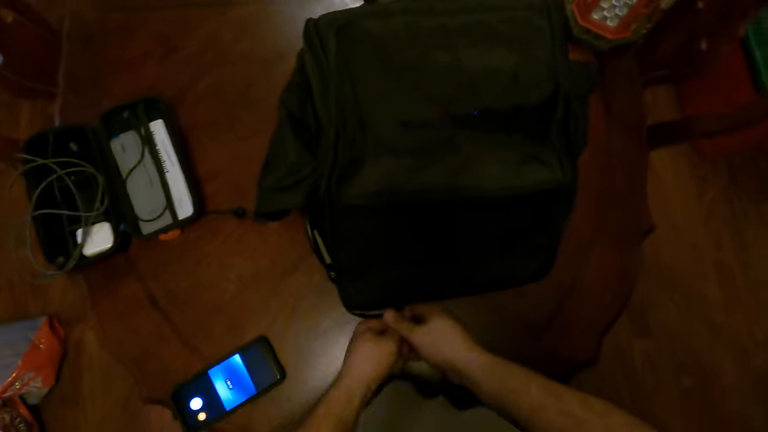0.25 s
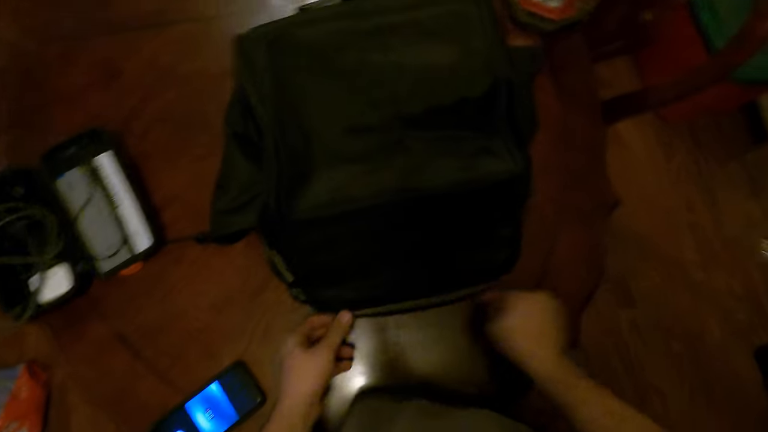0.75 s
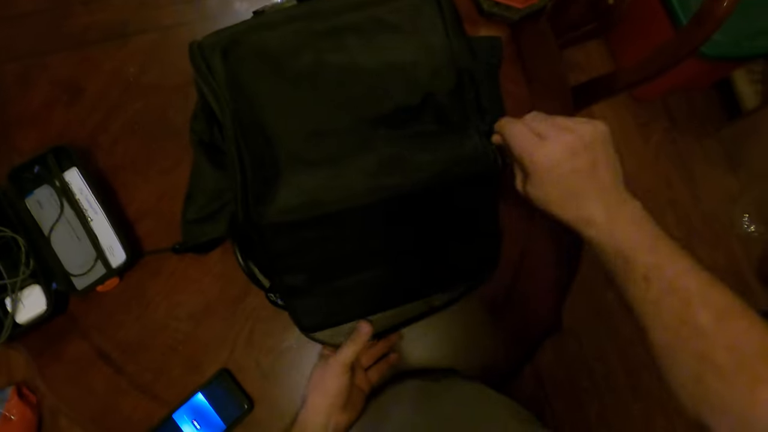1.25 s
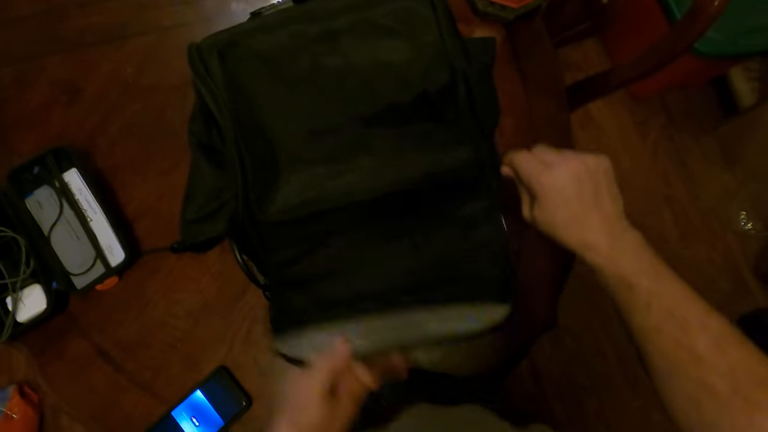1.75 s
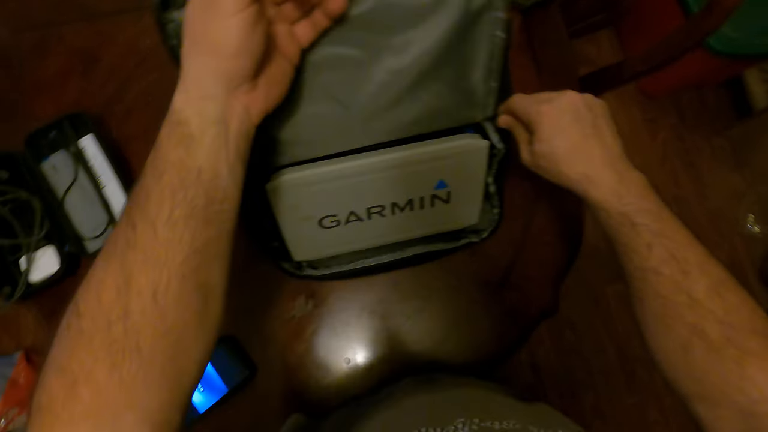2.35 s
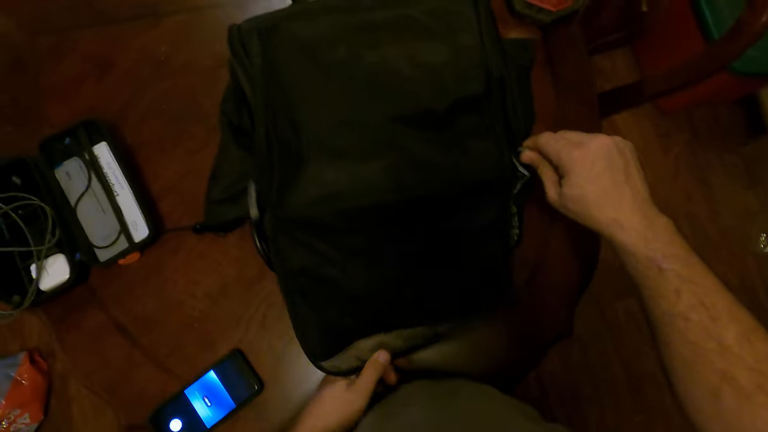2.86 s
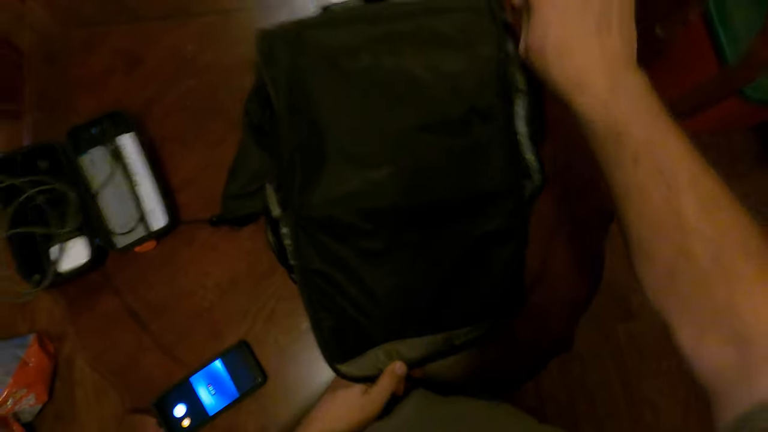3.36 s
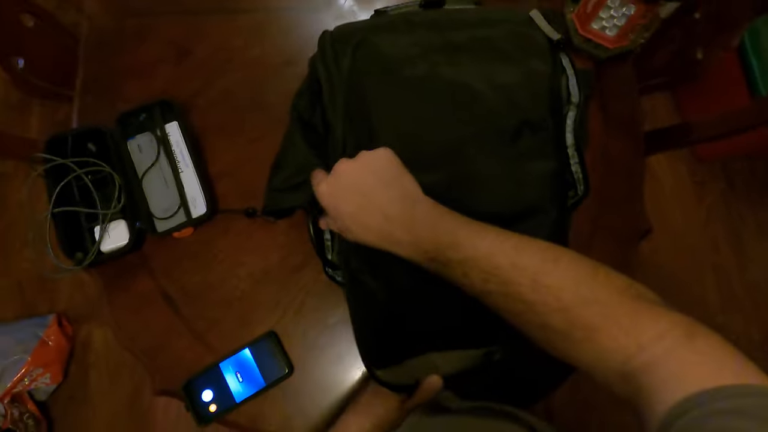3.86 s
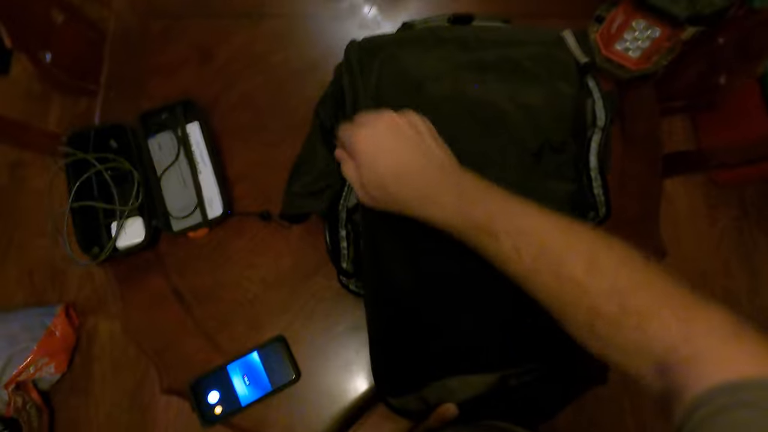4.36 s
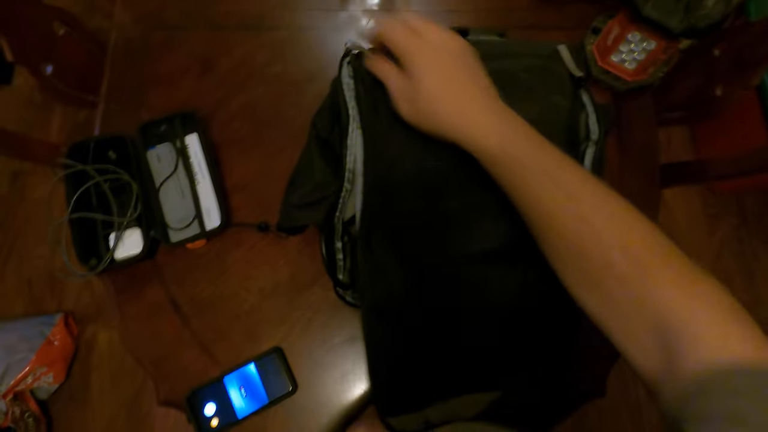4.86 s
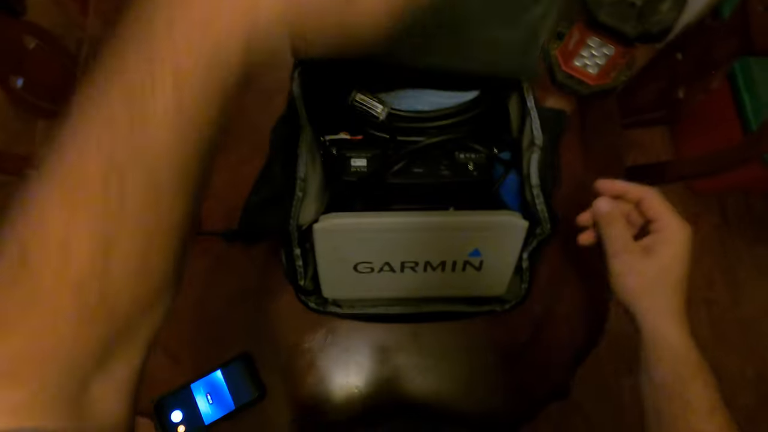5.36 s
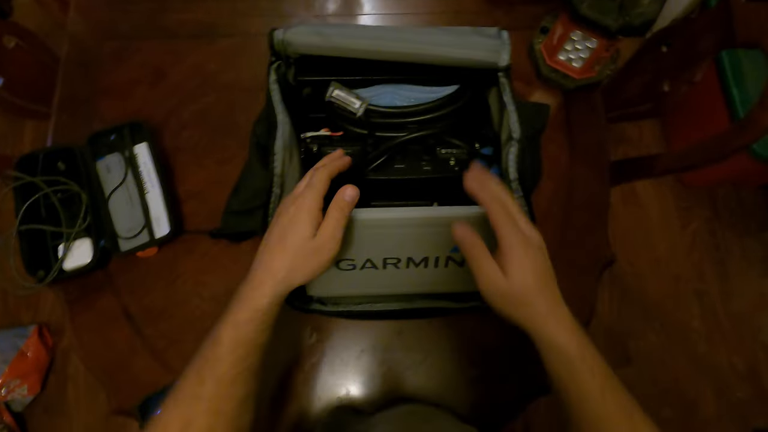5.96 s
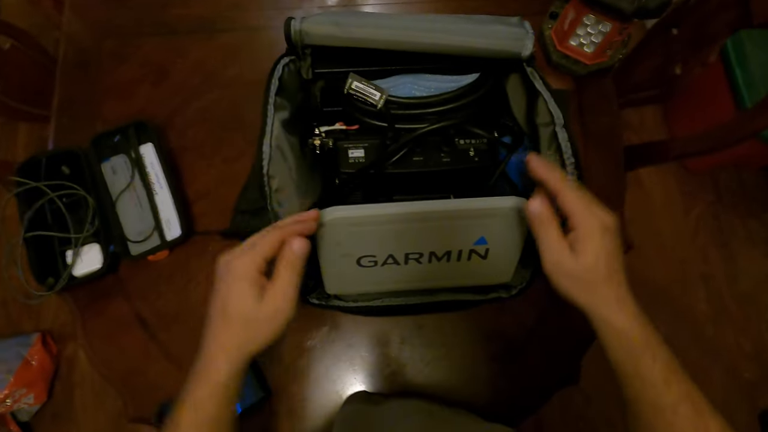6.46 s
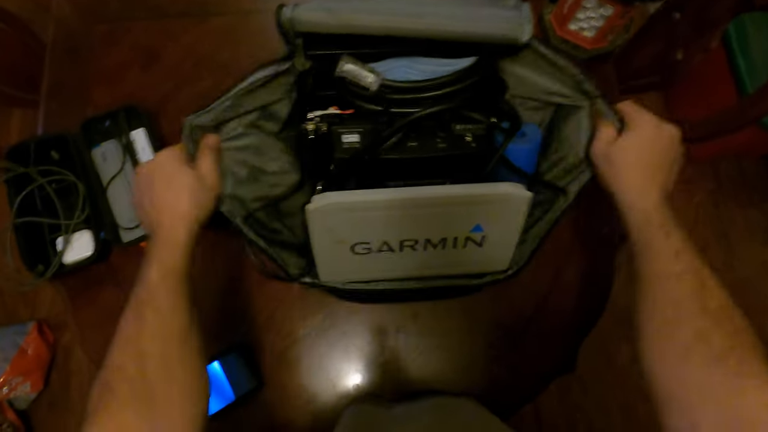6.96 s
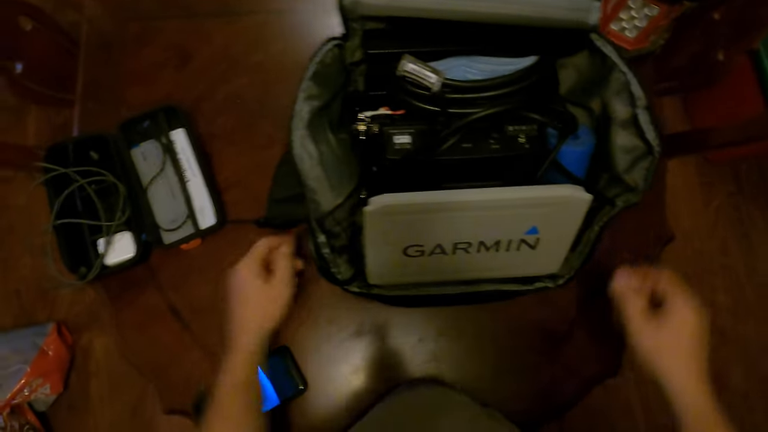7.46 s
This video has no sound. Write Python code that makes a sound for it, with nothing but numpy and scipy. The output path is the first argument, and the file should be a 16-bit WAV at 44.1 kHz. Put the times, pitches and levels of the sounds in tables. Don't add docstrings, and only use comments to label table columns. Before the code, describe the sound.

Close zipper pulls buzz and rasp along a cloth bag, with clicks, tab jingles and rustling lining, ending in a sharp flop as sides spread.

```python
import sys
import numpy as np
from scipy import signal
from scipy.fft import rfft, irfft
from scipy.io import wavfile
from scipy.ndimage import uniform_filter1d

SR = 44100
rng = np.random.default_rng(int(sys.argv[2]) if len(sys.argv) > 2 else 0)


def file_out(sig):
    cols = np.atleast_2d(sig).T
    lim = np.clip(cols, -1, 1)
    pcm = np.round(lim * 32767).astype(np.int16)
    wavfile.write(sys.argv[1], SR, pcm)


def volts(x):
    e = np.asarray(x, float) / 20
    return 10 ** e


N = 339570
T = np.arange(N) / SR

# pitch in Hz, width in Hz, level in dB rms.
HUM_LINES = [(59.94, 4.92, -48), (243, 13.25, -65.5), (29.2, 9.83, -60), (311, 20.1, -67),
             (118.9, 10.2, -65.5)]
# frequency in Hz, level in dB per Hz.
ROOM_SPECTRUM = [(12, -66), (20, -25), (32, -26), (36, -24), (49, -9.5), (70, -2), (90, -9), (115, -7.5),
                 (175, -18), (196, -19.5), (245, -5), (274, -30), (580, -61), (6540, -48.5), (15500, -79)]
ROOM_AIR_DB = -50
ROOM_T60_S, ROOM_WET_DB = 0.46, -16

# time in s, tooth rate in Hz, buzz in dB.
FRONT_PULLS = [
    [(0, 226, -29), (.08, 185, -38)],
    [(.135, 175, -31), (.23, 235, -25), (.29, 193, -45), (.4, 200, -34)],
    [(.3, 500, -40), (.335, 420, -34), (.385, 190, -28)],
    [(.71, 170, -50), (.75, 200, -33), (.78, 280, -38), (.825, 500, -28), (.9, 586, -49), (.95, 611, -38),
     (.98, 455, -38), (1.01, 233, -37), (1.07, 200, -36)],
    [(1.075, 303, -38), (1.105, 312, -30), (1.135, 290, -36), (1.17, 330, -35), (1.19, 310, -32),
     (1.228, 335, -37)],
    [(1.222, 330, -40), (1.252, 530, -37), (1.278, 550, -36), (1.289, 640, -31), (1.302, 770, -46),
     (1.322, 525, -34), (1.348, 355, -33), (1.378, 320, -33), (1.42, 220, -44)],
    [(1.495, 229, -54), (1.52, 322, -36), (1.57, 337, -39), (1.585, 556, -36), (1.61, 340, -31),
     (1.63, 205, -36), (1.7, 220, -60)],
]
# time in s, tooth rate in Hz, buzz in dB.
SIDE_PULLS = [
    [(1.815, 190, -50), (1.87, 150, -50), (1.935, 170, -48)],
    [(1.93, 191, -48), (2.01, 217, -44), (2.06, 242, -40), (2.1, 197, -45), (2.16, 184, -34),
     (2.23, 158, -44)],
    [(2.245, 70, -56), (2.3, 95, -56), (2.345, 120, -52), (2.385, 70, -56)],
    [(3.2, 302, -48), (3.25, 353, -40), (3.29, 460, -39), (3.325, 399, -37), (3.345, 330, -44),
     (3.4, 359, -43), (3.44, 300, -41), (3.478, 190, -44)],
    [(3.785, 191, -50), (3.82, 205, -28), (3.87, 162, -50)],
    [(4.39, 425, -46), (4.44, 440, -43), (4.465, 330, -40), (4.49, 229, -40)],
    [(4.58, 254, -46), (4.62, 320, -43), (4.665, 278, -37), (4.69, 299, -45), (4.71, 365, -31),
     (4.745, 525, -38), (4.785, 536, -32), (4.82, 397, -44), (4.86, 334, -45)],
]
# tooth sharpness, rasp in dB at the usual rate,
# bag wall in dB, fine hiss minus rasp in dB, tick peak in dB.
GRIPS = [(1, -44, -35, -7, -26), (1.6, -45, -29, -5, -22), (1.5, -48, -30, -5, -25),
         (2.4, -46, -40, -7, -23), (3, -43, -43, -9, -18), (2.5, -45, -42, -8, -21),
         (3.5, -40, -38, -14, -19), (6, -38, -42, -10, -15), (8, -38, -33, -7, -10), (4, -38, -41, -10, -9),
         (4.5, -42, -43, -8, -25), (1.3, -50, -45, -8, -30), (5, -45, -38, -11, -27),
         (2, -45, -37, -10, -22)]
# time in s, half length in s, extra tick in dB.
BEARS = [(.8, .05, 6), (.87, .02, 3), (1.1, .03, 3), (1.262, .02, 7), (1.303, .012, 4), (1.325, .015, 6),
         (1.54, .03, 4), (2.07, .04, 3), (2.17, .05, 5), (3.23, .03, 5), (4.63, .03, 6), (4.76, .03, 2)]
# centre in Hz, width in Hz, level in dB.
BAG_MODES = [(205, 130, -3), (320, 30, -1.5), (525, 86, -4), (710, 140, -8), (990, 670, -24),
             (2100, 900, -25)]
# centre in Hz, width in Hz, level in dB.
SLIDER_MODES = [(1070, 170, 1), (1700, 450, -2), (2250, 500, -3), (3000, 500, -13), (3850, 450, -11)]
USUAL_RATE_HZ, RASP_DB_PER_OCTAVE, RASP_TAIL_S = 400, 10, .01
USUAL_BUZZ_DB, SHARPER_DB_PER_DB = -36, .5
CATCH_DB, FRONT_WOBBLE, SIDE_WOBBLE = 2.5, .04, .075
TICK_TOP_HZ = 5000
TICK_DB_PER_OCTAVE, TICK_CATCH_DB = 5, 1.8

# time in s, left minus right in dB.
HANDS = [
    (0.0, 0.5),
    (0.86, -0.5),
    (2.46, 0.5),
    (3.17, -0.5),
    (6.63, 1),
    (6.75, -1.5),
    (7.7, 2),
]
# peak in s, rise in s per 20 dB, fall in s per 20 dB,
# rustle in dB, bag wall in dB.
HOLDS = [(0.0, .01, .12, -43, -31), (.44, .1, .2, -55, -56), (.74, .22, .1, -48, -40),
         (1.09, .1, .3, -37, -29), (1.51, .03, .15, -45, -38), (1.63, .08, .11, -43, -27),
         (1.44, .08, .14, -51, -50), (1.79, .1, .1, -55, -50), (1.822, .025, .3, -41, -33),
         (2.25, .1, .1, -49, -36), (2.345, .12, .12, -45, -35), (2.46, .2, .2, -57, -52),
         (3.026, .3, .2, -45, -40), (3.198, .003, .2, -41, -47), (3.42, .1, .1, -50, -30),
         (3.51, .05, .1, -55, -50), (3.68, .2, .1, -62, -54), (3.784, .004, .3, -58, -48),
         (4.04, .05, .08, -49, -52), (4.144, .3, .4, -49, -46), (4.388, .008, .08, -37, -33),
         (4.57, .06, .1, -50, -44), (4.76, .08, .1, -39, -45), (4.88, .1, .3, -59, -50)]
# peak in s, rise in s per 20 dB, fall in s per 20 dB,
# rustle in dB, bag wall in dB.
FOLDS = [(.15, .15, .2, -52, -34), (.5, .2, .1, -57, -55), (.84, .2, .2, -44, -45), (2.0, .4, .3, -47, -31),
         (2.57, .15, .15, -62, -65), (2.76, .1, .4, -51, -45), (5.1, .08, .1, -58, -60),
         (3.9, .25, .4, -58, -50), (5.488, .11, .07, -33, -33), (5.31, .06, .1, -50, -50),
         (5.552, .03, .25, -55, -43), (6.005, .12, .09, -45, -45), (6.19, .02, .2, -61, -57),
         (6.35, .11, .08, -33, -35), (6.48, .3, .1, -45, -42), (6.895, .004, .2, -59, -55),
         (7.35, .09, .1, -41, -37)]
# peak in s, rise in s per 20 dB, fall in s per 20 dB,
# rustle in dB, bag wall in dB.
SPREADS = [(5.15, .25, .2, -53, -39), (5.2, .05, .5, -51, -47), (5.4, .3, .1, -50, -43),
           (5.92, .02, .2, -48, -41), (6.3, .1, .1, -50, -42), (6.64, .012, .07, -55, -60),
           (6.76, .4, .3, -72, -62), (7.0, .07, .1, -44, -44), (7.068, .06, .1, -25.5, -21),
           (7.2, .2, .3, -52, -46), (7.47, .1, .15, -58, -54), (7.41, .15, .12, -42, -44),
           (7.68, .2, .2, -64, -55)]
# time in s, rustle in dB, bag wall in dB, half length in s.
SWISHES = [
    (.335, -47, -50, 0.016),
    (2.816, -57, -64, 0.016),
    (3.016, -49, -45, 0.018),
    (5.313, -49, -52, 0.01),
    (5.483, -43, -64, 0.017),
    (5.555, -40, -35, 0.017),
    (6.211, -54.5, -70, .025),
    (6.383, -50, -38, 0.015),
    (7.0, -39.5, -58, 0.011),
    (7.082, -37, -35.5, 0.017),
]
# frequency in Hz, level in dB per Hz.
RUSTLE_SPECTRUM = [(410, -26), (700, -8), (828, -5.5), (1020, -3), (1370, -0.5), (1830, 1.5), (2800, -2.5),
                   (3580, -6.5), (4640, -12.5), (6760, -14), (9590, -29.5), (12100, -28.5), (15500, -56)]
# frequency in Hz, level in dB per Hz.
WALL_SPECTRUM = [(53, -52.5), (90, -22.5), (178, -1), (290, -2.5), (557, -5), (833, -17), (958, -11),
                 (1280, -15.5), (1920, -21), (2500, -23.5), (3250, -41), (5500, -120)]
HOLD_HISS_DB, FOLD_HISS_DB = -11, -4

# time in s, peak in dB, ring in Hz, treble minus peak in dB.
KNOCKS = [(0.636, -31, 490, -16), (1.78, -33, 770, -9), (2.378, -28.5, 556, -5), (2.423, -31, 463, -18),
          (2.729, -31, 595, -6), (2.9, -25, 418, -13), (2.933, -22, 564, -6), (3.009, -9.5, 597, -25.5),
          (3.784, -46, 431, -12), (3.914, -31.5, 635, -10), (4.216, -37, 522, -11), (4.946, -35, 540, -4),
          (5.283, -37, 1120, -3), (5.396, -33, 657, -10), (5.425, -28.5, 527, -6), (5.543, -25, 560, -12),
          (5.88, -48, 415, 1.5), (5.925, -28, 440, -9.5), (6.636, -48, 3000, -15), (6.891, -55, 1740, -13),
          (7.0565, -24, 1500, -3), (7.065, -22, 401, -10), (7.07, -13.5, 1990, -11), (7.09, -20, 1900, -14),
          (7.109, -24, 2050, -18), (7.066, -17, 250, -30), (1.492, -38, 700, -6), (2.345, -29, 2100, -12),
          (5.587, -38, 3500, -10), (7.206, -24.5, 1730, -11), (7.43, -27, 404, -12)]
KNOCK_T60_S, SOFT_RING_S_PER_DB, KNOCK_PAN_SPREAD = .012, .0005, 1.5
# time in s, ring in Hz, peak in dB, t60 in s.
SNAPS = [(5.168, 1230, -22.5, 0.013), (5.167, 2200, -22.5, 0.014), (5.168, 2870, -24.5, .012),
         (5.167, 3500, -33, 0.014), (5.171, 1870, -33, 0.042), (6.372, 182, -26, .15),
         (0.691, 130, -34, .12), (4.845, 1020, -42, .3), (7.07, 260, -24, .1), (1.42, 300, -44, .12),
         (1.812, 2860, -39, .05), (3.198, 2500, -39, .06), (6.2, 1120, -46, .2)]
# time in s, peak in dB, ring in Hz, t60 in s.
JINGLES = [(3.537, -60, 11980, 0.017), (3.563, -56, 10000, .01), (3.564, -56, 7000, .01),
           (3.5935, -47, 7800, .035), (3.602, -57, 9500, .01), (3.625, -60, 7800, .03),
           (3.164, -54, 7000, .01), (3.65, -51, 7700, .03), (3.662, -62, 6200, .06),
           (3.206, -48, 7800, .01), (3.459, -44, 7000, .004), (3.466, -41, 4500, .004),
           (3.474, -44, 4500, .006), (1.638, -39, 6000, .006), (1.648, -39, 5500, .006),
           (1.66, -36, 5000, .006), (6.19, -48, 6400, .01), (6.91, -50, 6500, .008),
           (7.0565, -30, 6500, .008), (7.091, -36, 7000, .01), (7.226, -50, 7500, .006),
           (7.259, -50, 7000, .006), (7.296, -46, 6000, .006), (7.375, -34, 5300, .008)]
# peak in s, rise in s per 20 dB, fall in s per 20 dB, level in dB.
PUFFS = [
    (2.262, .15, .09, -35),
    (5.564, .3, .25, -36),
    (5.908, .1, .2, -40),
    (6.294, .085, .1, -37),
    (7.104, .15, .06, -34),
]

PORT_LAG_S, TOP_HZ = 2.2e-5, 15350


def level(x, db):
    return x * volts(db) / np.sqrt(np.mean(x ** 2))


def band(x, hz, width):
    return signal.lfilter(*signal.iirpeak(hz, hz / width, fs=SR), x)


def colour(x, points):
    hz, db = np.transpose(points)
    f = np.maximum(np.arange(N // 2 + 1) * SR / N, 1)
    gain = volts(np.interp(np.log(f), np.log(hz), db, -120, -120))
    return level(irfft(rfft(x) * gain, N), 0)


def walk(rate):
    k = int(SR / rate)
    steps = np.repeat(rng.standard_normal(N // k + 1), k)
    return 1.327 * uniform_filter1d(uniform_filter1d(steps, k), k)[:N]


def pan(db):
    return volts(np.array([[.5], [-.5]]) * db)


def place(x, pan_db, apart):
    side = apart * signal.lfilter([1, -1], [1, -.6], np.roll(x, shift=9001))
    return (x + np.array([[1], [-1]]) * side) * pan(pan_db)


def decay(t, t60):
    return np.exp(-np.log(1000) * t / t60)


def hum():
    lines = 0
    for hz, width, db in HUM_LINES:
        phase = np.cumsum(hz + 0.413 * width * walk(12)) / SR
        lines = lines + level(np.sin(2 * np.pi * phase) * volts(2.0 * walk(14)), db)
    air = colour(rng.standard_normal(N), ROOM_SPECTRUM) * volts(ROOM_AIR_DB + 0.48 * walk(8))
    return lines + place(air, -1.66, 0.86)


def teeth():
    push, tick, gate, drag = np.zeros(N), np.zeros(N), np.ones(N), np.zeros((3, N))
    quick, slow, sizes = walk(250), walk(45), rng.standard_normal(N // 40)
    pace = .7 * (quick + slow)
    catch_db = CATCH_DB * slow[::-1]
    strike_catch_db = TICK_CATCH_DB * np.roll(slow, shift=20000)
    bear_db = sum(db * np.exp(-((T - s) / half_s) ** 2) for s, half_s, db in BEARS)
    for i, (run, grip) in enumerate(zip(FRONT_PULLS + SIDE_PULLS, GRIPS)):
        grit, rasp_db, wall_db, hiss_db, tick_db = grip
        s, *columns = np.transpose(run)
        now = (T >= s[0]) & (T <= s[-1])
        hz, db = (np.interp(T[now], s, c) for c in columns)
        octaves = np.log2(hz / USUAL_RATE_HZ)
        wobble = FRONT_WOBBLE if i < len(FRONT_PULLS) else SIDE_WOBBLE
        phase = np.cumsum(hz * (1 + wobble * pace[now])) / SR
        swing = np.cos(2 * np.pi * phase) - 1

        tooth = (phase + .5).astype(int) + int(s[0] * 600)
        size = volts(catch_db[now] + 2.6 * sizes[tooth]) * signal.windows.tukey(now.sum(), .12)
        sharp = np.clip(grit * volts(SHARPER_DB_PER_DB * (USUAL_BUZZ_DB - db)), .5, 9)
        pulse = np.exp(sharp * swing) - 0.21 / np.sqrt(sharp)
        push[now] += size * volts(db) * pulse * 2.7 * np.sqrt(sharp)
        strike_db = tick_db + bear_db[now] + TICK_DB_PER_OCTAVE * octaves + strike_catch_db[now]
        tick[now] += size * volts(strike_db) * np.exp((TICK_TOP_HZ / hz) ** 2 * swing)

        gate[now] += 3 * np.exp(-(phase % 1) / .3) * signal.windows.tukey(now.sum(), .3)
        onset = np.minimum((T[now] - s[0]) / .02 + .3, 1)
        rasp = volts(rasp_db + RASP_DB_PER_OCTAVE * octaves) * onset
        drag[:, now] += np.array([rasp, rasp * volts(hiss_db), 0 * rasp + volts(wall_db)]) ** 2
    keep = np.exp(-1 / (RASP_TAIL_S * SR))
    drag = signal.lfilter([1 - keep], [1, -keep], drag)
    body = .45 * push + sum(volts(db) * band(push, f, w) for f, w, db in BAG_MODES)
    slider = sum(volts(db) * band(band(tick, f, w), f, 2 * w) for f, w, db in SLIDER_MODES)
    return -band(body, 400, 4500) - slider, gate / uniform_filter1d(gate, size=500), drag


def swells(rows, column):
    t = T[::44]
    power = 0
    for row in rows:
        peak_s, rise_s, fall_s = row[:3]
        down = np.maximum((peak_s - t) / rise_s, (t - peak_s) / fall_s)
        power = power + volts(row[column] - 20 * down) ** 2
    return np.interp(T, t, power)


def crackle(share, spread_db):
    snaps_db = (rng.random(N) < share) * spread_db * np.minimum(rng.exponential(size=N), 2.5)
    return rng.standard_normal(N) * signal.lfilter([1], [1, -.96], volts(snaps_db) - 1 + 0.019)


def patchy(x, depth_db):
    centres = 700 * 1.3 ** np.arange(8)
    return sum(band(band(x, hz, .5 * hz), hz, .5 * hz) * volts(depth_db * walk(14)) for hz in centres)


def cloth(gate, drag):
    holds, lifts = swells(HOLDS + SPREADS, column=3), swells(FOLDS, column=3)
    power = drag[0] + holds + lifts
    hiss_power = drag[1] + volts(2 * HOLD_HISS_DB) * holds + volts(2 * FOLD_HISS_DB) * lifts
    fine = np.sqrt(hiss_power / power)
    pan_db = np.interp(T, *np.transpose(HANDS))
    rub = np.sqrt(power) * volts(1.58 * walk(25))
    flop = np.sqrt(drag[2] + swells(HOLDS + SPREADS + FOLDS, column=4)) * volts(-6 + 2.65 * walk(35))
    for s, rub_db, flop_db, half_s in SWISHES:
        swell = np.exp(-((T - s) / half_s) ** 2)
        rub = rub + volts(rub_db) * swell
        flop = flop + volts(flop_db) * swell
    fibres = colour(crackle(.005, 2.2), RUSTLE_SPECTRUM)
    rasp = signal.sosfiltfilt(signal.butter(3, 4800, fs=SR, output="sos"), fibres)
    folds = patchy(rasp, depth_db=1.5)
    hiss = place(level(fibres - rasp, -1.5), pan_db, .3)
    rustle = place(level(folds, -2.48), pan_db, 0.46) + hiss * fine * volts(1.2 + 1.4 * walk(30))
    walls = place(colour(crackle(0.0012, 2.9), WALL_SPECTRUM), pan_db, 0.94)
    return rustle * gate * rub + walls * flop


def knocks():
    out, t = np.zeros((2, N)), T[:6000]
    for (s, db, hz, treble_db), noise in zip(KNOCKS, rng.standard_normal((len(KNOCKS), 6000))):
        t60 = KNOCK_T60_S - SOFT_RING_S_PER_DB * treble_db
        pan_db = KNOCK_PAN_SPREAD * np.interp(s, *np.transpose(HANDS))
        tone = 1.04 * np.sin(2 * np.pi * hz * t) + 0.29 * np.sin(2 * np.pi * 0.615 * hz * t)
        overtones = sum(np.sin(2 * np.pi * ratio * hz * t) for ratio in (1.7, 2.3, 3.1))
        ring = decay(t, max(t60, .004)) * (tone + volts(treble_db) * overtones)
        burst = band(band(noise, 3000, 6000), 3000, 7000) * np.exp(-t / 0.00079)
        crack = volts(treble_db) * 1.5 * burst
        i = int(s * SR)
        out[:, i:i + 6000] += volts(db - 4.5) * pan(pan_db) * (ring + crack)
    return out


def snaps():
    out, t = np.zeros(N), T[:6000]
    for s, hz, db, t60 in SNAPS:
        swing = np.minimum(t * hz / 0.87, 1) * decay(t, t60)
        i = int(s * SR)
        out[i:i + 6000] += volts(db) * swing * np.sin(2 * np.pi * hz * t)
    return out


def jingle():
    out, t = np.zeros(N), T[:6000]
    for (s, db, hz, t60), noise in zip(JINGLES, rng.standard_normal((len(JINGLES), 6000))):
        ring = sum(np.sin(2 * np.pi * ratio * hz * t) for ratio in (1.01, .985)) / 2
        tick = 1.5 * band(band(noise, .9 * hz, 3500), .9 * hz, 3500) * np.exp(-t / 0.0016)
        i = int(s * SR)
        out[i:i + 6000] += volts(db + 1.5) * (ring * decay(t, max(t60, .004)) + tick)
    return out


def puffs():
    gain = uniform_filter1d(np.sqrt(swells(PUFFS, column=3)), size=900)
    return colour(rng.standard_normal(N), [(12, -14), (28, -4.5), (70, -6.5), (130, -24.5)]) * gain


def room(x):
    t = T[:SR // 2]
    tail = rng.standard_normal((2, len(t))) * decay(t, ROOM_T60_S) * (t > .004)
    tail = 1.03 * tail[0] + 0.34 * tail[1] * np.array([[1], [-1]])
    tail = signal.lfilter([1], [1, -.6], tail)
    return signal.fftconvolve(x[None], tail / np.sqrt(np.sum(tail[0] ** 2)), axes=1)[:, :N]


def scene():
    buzz, gate, drag = teeth()
    near = buzz * pan(-.8) + cloth(gate, drag) + knocks() + snaps() + jingle()
    return near + volts(ROOM_WET_DB) * room(near.mean(axis=0)) + puffs() + hum()


def band_limit(x):
    return signal.sosfilt(signal.butter(12, 15640, fs=SR, output="sos"), x)


def record(dry):
    hz = np.arange(N // 2 + 1) * SR / N
    lag_s = PORT_LAG_S * np.exp(-hz / 9000)
    late = irfft(rfft(dry[0]) * np.exp(-2j * np.pi * hz * lag_s), N) * volts(-.3)
    trim = signal.ellip(8, .3, 60, TOP_HZ, fs=SR, output="sos")
    return band_limit(signal.sosfilt(trim, [late, dry[1]]))


dry = scene()
out = record(dry)
file_out(out)
```